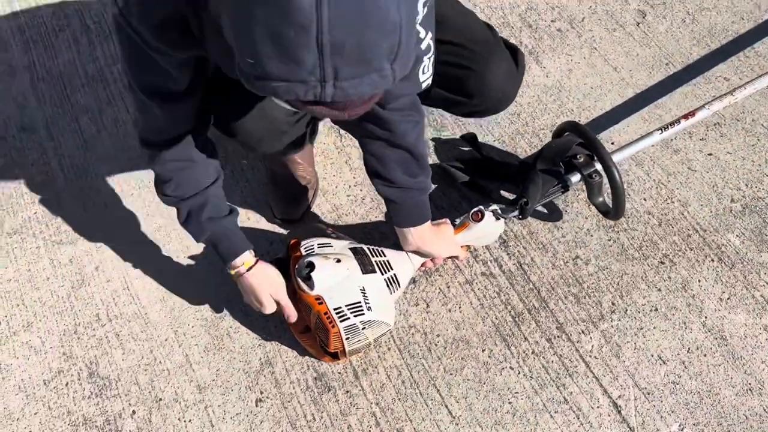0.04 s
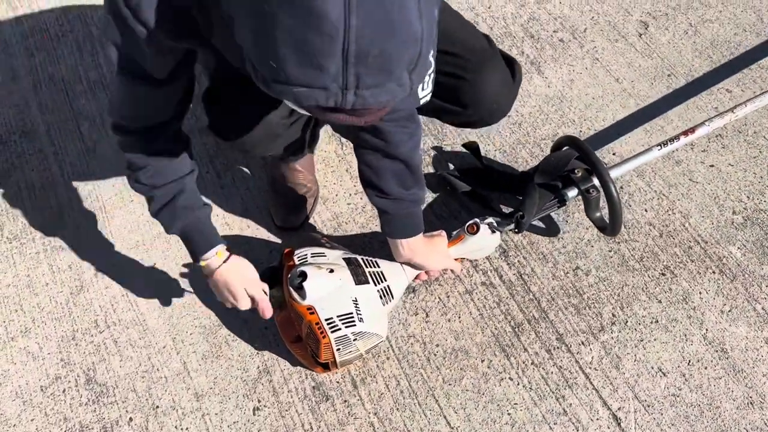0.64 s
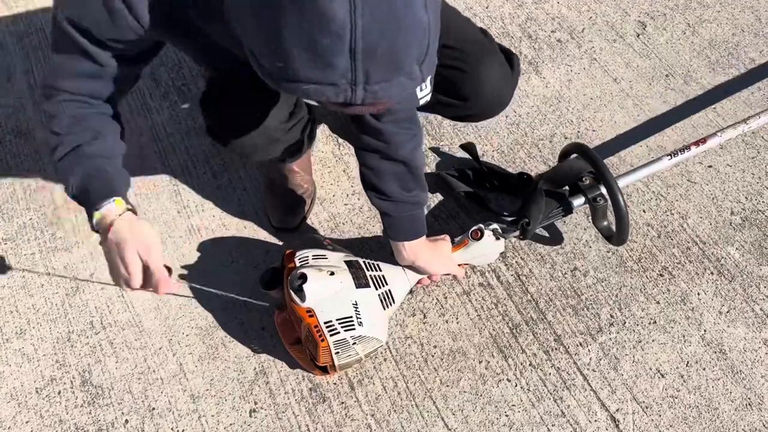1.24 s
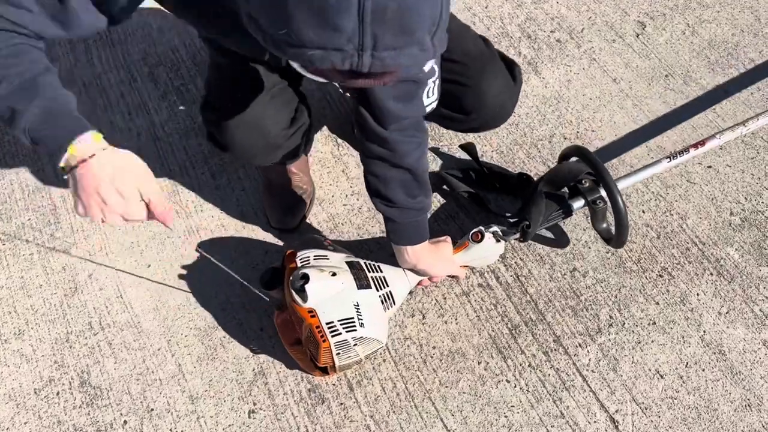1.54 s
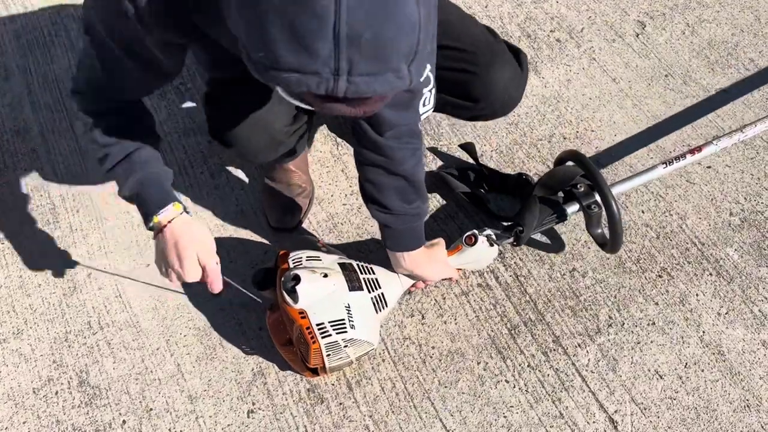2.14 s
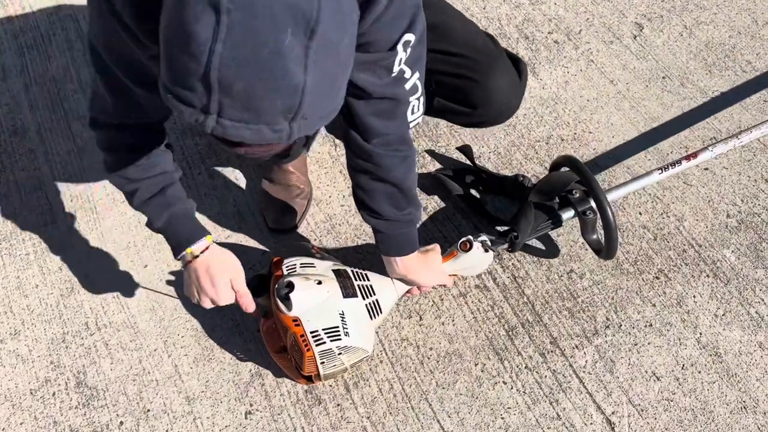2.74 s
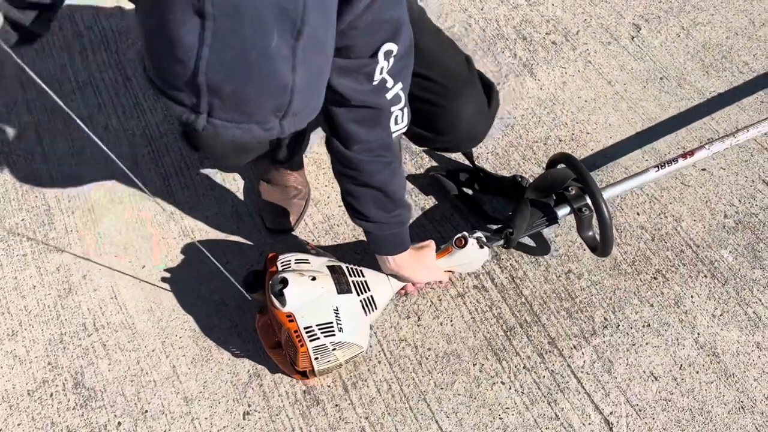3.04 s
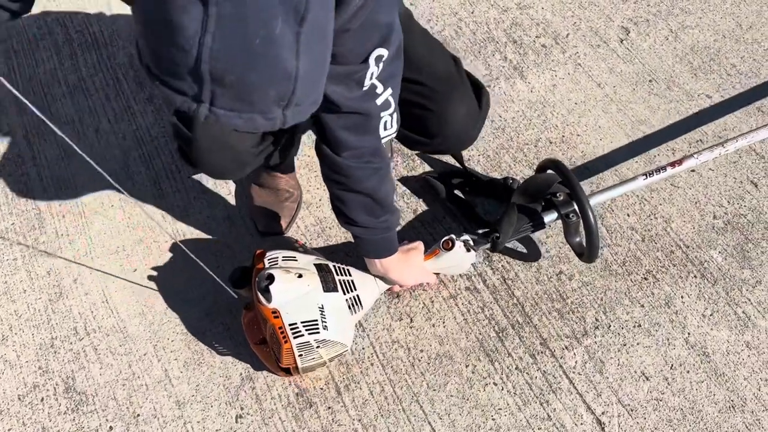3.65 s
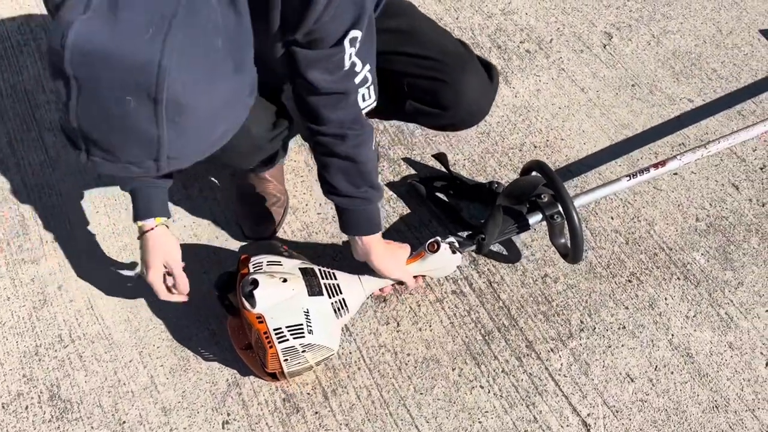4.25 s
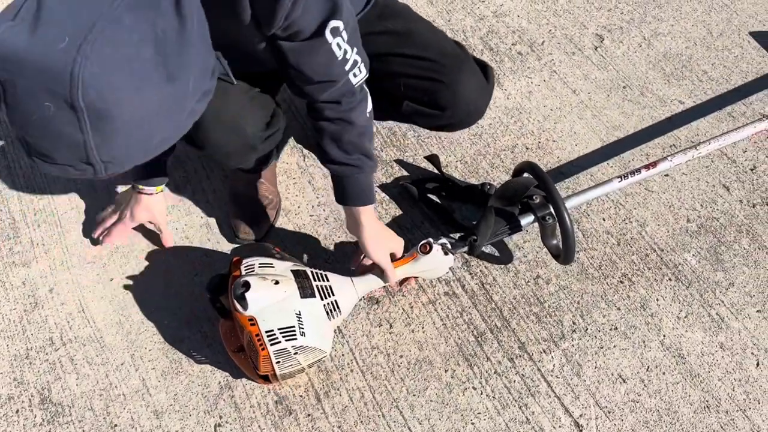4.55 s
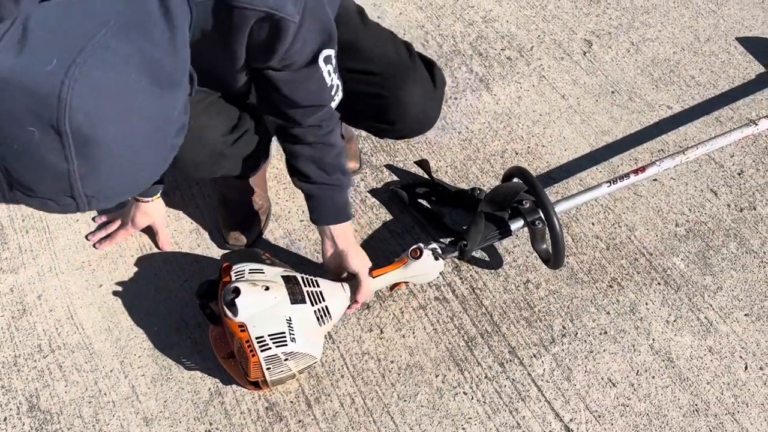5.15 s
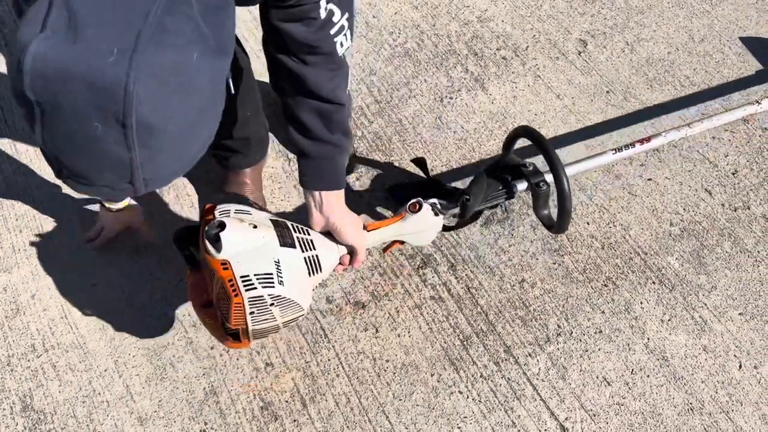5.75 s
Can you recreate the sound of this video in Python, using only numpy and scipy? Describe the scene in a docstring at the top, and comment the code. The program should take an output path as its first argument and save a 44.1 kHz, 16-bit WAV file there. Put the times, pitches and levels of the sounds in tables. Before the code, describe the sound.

Outdoors on concrete, close to the microphone, a petrol string trimmer's starter cord is pulled six times in quick succession. Each pull brings a clack, a rasp of cord and hollow chugs of the engine turning over, then a hissing rewind. The handle snaps home and a low, muffled engine drone rises and holds, with light handling bumps and faint bird chirps.

```python
"""Outdoors, on concrete: a two-stroke string trimmer has its starter cord pulled six times.
Each pull clacks the pawls, rasps the cord through its eyelet and turns the engine over in hollow
gulps of air; the plastic housing knocks and the spring reels the cord in. The handle snaps home and
a low engine drone rises and runs on, with faint bird chirps and some handling."""
import sys
import numpy as np
from scipy import signal
from scipy.fft import rfft, irfft, next_fast_len
from scipy.io import wavfile
from scipy.ndimage import uniform_filter1d

SR = 44100
rng = np.random.default_rng(int(sys.argv[2]) if len(sys.argv) > 2 else 0)


def wav_out(sig):
    """Save sig, one row per channel (or a flat mono array), as 16-bit PCM at SR to the path in sys.argv[1]."""
    wavfile.write(sys.argv[1], SR, np.round(np.clip(np.atleast_2d(sig).T, -1, 1) * 32767).astype(np.int16))


N = 260190
T = np.arange(N) / SR
HIT_T = np.arange(4096) / SR  # time axis of one impact
SIDE = np.array([[1], [-1]])  # left, right


def undb(db):
    """Decibels to gain."""
    return 10 ** (np.asarray(db) / 20)


def unit(x):
    """Scale to rms 1."""
    return x / np.sqrt(np.mean(x ** 2))


def add(track, start_s, x):
    """Mix x into the track from start_s on."""
    i = max(int(start_s * SR), 0)
    track[i:i + len(x)] += x[:max(N - i, 0)]


def butter(x, order, edge_hz, kind):
    """Butterworth filter."""
    return signal.sosfilt(signal.butter(order, edge_hz, kind, fs=SR, output="sos"), x)


def colour(x, spectrum):
    """Minimum-phase filter from (frequency [Hz], gain [dB]) rows; output rms 1."""
    size = next_fast_len(len(x) + 2048, real=True) // 2 * 2
    hz, db = np.transpose(spectrum)
    bin_hz = np.fft.rfftfreq(size, 1 / SR)
    gain = undb(np.interp(np.log(bin_hz + 1), np.log(hz), db))
    cepstrum = irfft(np.log(gain))
    cepstrum[1:size // 2] *= 2
    cepstrum[size // 2 + 1:] = 0
    response = np.exp(rfft(cepstrum))
    return unit(irfft(rfft(x, size) * response)[:len(x)])


def walk(rate_hz):
    """Smooth random wander, spread near 1."""
    return np.interp(T * rate_hz, np.arange(4096), rng.standard_normal(4096))


def grains(per_s, spread_db):
    """Dense random impulses of unequal size."""
    hits = rng.random(N) < per_s / SR
    return hits * rng.standard_normal(N) * undb(spread_db * rng.standard_normal(N))


def swell(start_s, end_s, attack_s, release_s):
    """Attack, hold, release; each ramp covers 20 dB in its time."""
    return undb(-20 * (np.maximum(start_s - T, 0) / attack_s + np.maximum(T - end_s, 0) / release_s))


def decay(t60_s, db=0):
    """Exponential decay of one impact, starting at db."""
    return undb(db - 60 * HIT_T / t60_s)


def onset(attack_s):
    """Exponential rise of one impact."""
    return 1 - np.exp(-HIT_T / attack_s)


def ping(hz, attack_s, t60_s):
    """Struck resonance with a rounded attack."""
    attack = 1 - np.exp(-(HIT_T / attack_s) ** 2)
    return attack * decay(t60_s) * np.sin(2 * np.pi * hz * HIT_T)


def scatter(x, t60_s):
    """Diffuse reverb; a separate unit-energy tail per side."""
    t = np.arange(16384) / SR
    tails = rng.standard_normal((2, len(t))) * undb(-60 * t / t60_s)
    tails /= np.linalg.norm(tails, axis=1, keepdims=True)
    return signal.fftconvolve(x[None], tails, axes=1)[:, :N]


# Outdoor background spectrum: (frequency [Hz], gain [dB])
AIR_SPECTRUM = [(25, -43.5), (55, 0), (130, -5), (600, -21), (1300, -28), (4000, -47.5), (7000, -57.5),
                (15000, -65)]


def air():
    """Low outdoor noise: centred in the bass, diffuse above."""
    mid, side = (colour(rng.standard_normal(N), AIR_SPECTRUM) * undb(.8 * walk(5)) for _ in range(2))
    return undb(-38) * mid + undb(-39) * butter(side, 1, 600, "high") * SIDE


# Bird notes: (time [s], length [s], start pitch [Hz], end pitch [Hz], relative level [dB])
CHIRPS = [(2.697, 0.071, 5460, 4980, -43.5), (5.746, 0.034, 3920, 4930, -54.5),
          (5.775, .018, 5000, 4130, -53), (5.802, 0.05, 3440, 3970, -49)]


def bird(trill_per_s=64, trill_depth_hz=170, rasp_share=.8):
    """Thin raspy chirps that slide and quiver, blurred by distance."""
    out = np.zeros(N)
    quiver_hz = trill_depth_hz * np.sin(2 * np.pi * trill_per_s * T + walk(40))
    for s, length_s, start_hz, end_hz, db in CHIRPS:
        along = np.clip((T - s) / length_s, 0, 1)
        phase = 2 * np.pi * np.cumsum(start_hz + (end_hz - start_hz) * along + quiver_hz) / SR
        rasp = walk(750) * np.sin(phase) + walk(750) * np.cos(phase)
        note = np.sqrt(1 - rasp_share) * np.sin(phase) + np.sqrt(rasp_share / 2) * rasp
        out += undb(db - 1) * np.sin(np.pi * along) * note
    return out + undb(.5) * scatter(out, t60_s=.35)


# High chirp spectrum: (frequency [Hz], gain [dB])
HIGH_CHIRP_SPECTRUM = [(3000, -31), (4200, -5), (5050, -2), (5600, -19), (7300, -23), (9000, -34)]


def high_chirp():
    """One short, raspy chirp near 5 kHz, probably a bird."""
    rasp = colour(grains(2500, 2), HIGH_CHIRP_SPECTRUM)
    return undb(-42) * rasp * swell(5.475, 5.504, attack_s=.024, release_s=.074)


# Engine run-up: (time [s], firing rate [Hz], firing tone level [dB], octave weight [dB])
RUN_UP = [(3.8, 61.9, -31, -38.5), (3.95, 65.3, -46, -28.5), (4.1, 68.2, -41, -29),
          (4.22, 73.5, -27, -30.5), (4.32, 78.2, -28.5, -21.5), (4.41, 83.7, -19, -32),
          (4.56, 87.56, -24, -39), (4.77, 87, -14, -40), (4.88, 88.1, -18.5, -42),
          (4.98, 86.65, -29.5, -36), (5.2, 86.55, -29, -36.5), (5.46, 92.9, -20.5, -40),
          (5.62, 89.24, -28, -43), (5.78, 92.3, -18, -50), (5.9, 91.8, -19.5, -32)]
# Steady engine lines: (frequency [Hz], level [dB], throb [dB])
ENGINE_LINES = [(56.3, -36.5, 1), (161, -35, 2), (199, -42, 3), (313, -48.5, 4)]
# Upper firing harmonics: (multiple, level re firing tone [dB])
PUTTER = [(4, -41.5), (5, -38.5), (6, -37), (7, -37.5), (8, -41)]
# Exhaust spectrum: (frequency [Hz], gain [dB])
EXHAUST_SPECTRUM = [(30, -28.5), (55, -15.5), (110, 5.5), (170, 12.5), (230, -2), (300, -39.5), (450, -16),
                    (900, -33), (2000, -54.5), (6000, -85)]


def drone(rate_waver=.0188, throb_db=1):
    """A muffled engine gathers speed and holds it: uneven firings, throbbing lines, exhaust rumble."""
    times, rate_hz, *levels_db = np.transpose(RUN_UP)
    curves_db = [np.interp(T, times, db, left=-np.inf, right=-np.inf) for db in levels_db]
    firing_gain, octave_gain = uniform_filter1d(undb(curves_db), size=300)
    hz = np.interp(T, times, rate_hz) * (1 + rate_waver * walk(30))
    phase = 2 * np.pi * np.cumsum(hz) / SR
    firing = firing_gain * np.sin(phase) * undb(throb_db * walk(45))
    octave = octave_gain * np.sin(2 * phase + .72 * walk(30)) * undb(-3 + 2.7 * walk(28))
    lines = sum(undb(db + depth_db * walk(26)) * np.sin(2 * np.pi * line_hz * T + .41 * walk(24))
                for line_hz, db, depth_db in ENGINE_LINES)
    lines *= np.interp(T, [4.1, 4.8], [0, 1])
    putter = firing_gain * sum(undb(db + 2.6 * walk(20)) * np.cos(k * phase) for k, db in PUTTER)
    gas = rng.standard_normal(N) * (1 + .58 * np.cos(phase))  # one puff per firing
    rumble = undb(-34) * colour(gas, EXHAUST_SPECTRUM) * np.interp(T, [3.9, 4.4], [0, 1])
    return np.sqrt(2) * (firing + octave + putter + lines) + rumble


# Sleeve and hand on the shaft: (time [s], length [s], level [dB])
BRUSHES = [(4.32, 0.016, -56.5), (4.366, 0.017, -55), (5.018, 0.66, -65.5), (5.355, 0.03, -49),
           (5.38, 0.066, -50), (5.45, 0.06, -43)]


def brushes():
    """Cloth and skin slide softly on the shaft."""
    out = np.zeros(N)
    hiss = colour(grains(14000, 1.5), [(2000, .5), (5000, 1.5), (8000, -3.5), (14000, -7)])
    for s, length_s, db in BRUSHES:
        along = np.clip((T - s) / length_s, 0, 1)
        out += undb(db) * hiss * np.sin(np.pi * along) ** 2
    return out


# Handling bumps: (time [s], relative level [dB], thud pitch [Hz], scuff cutoff [Hz])
BUMPS = [(5.682, -21.5, 450.6, 964), (5.8391, -25.5, 567.4, 2230), (5.872, -25, 342, 5460)]


def bumps():
    """The hand shifts the trimmer: soft thud, short ring, scuff."""
    out = np.zeros(N)
    ring = undb(-6.5) * ping(745, attack_s=.003, t60_s=.12)
    for s, db, hz, cutoff_hz in BUMPS:
        thud = undb(7.5) * ping(hz, attack_s=.004, t60_s=.043)
        scuff = butter(rng.standard_normal(len(HIT_T)), 2, [250, cutoff_hz], "band")
        scuff *= onset(.0025) * (decay(.016) + decay(.11, db=-19))
        add(out, s, undb(db) * (thud + ring + undb(-18) * unit(scuff)))
    return out


# Cord flicks: (time [s], level [dB])
FLICKS = [(.052, -32), (.2395, -21), (0.3236, -20), (0.9, -30), (2.1027, -31), (2.2153, -26.5),
          (2.8734, -27), (2.9457, -24), (3.283, -27.5), (3.5812, -17.5), (4.109, -23)]
# Flick spectrum: (frequency [Hz], gain [dB])
FLICK_SPECTRUM = [(1500, -21), (4000, -3.5), (7500, -0.5), (10000, -2), (13000, -3.5), (15500, -7.5)]


def flicks():
    """The cord hits its eyelet in thin bright ticks."""
    out = np.zeros(N)
    for s, db in FLICKS:
        noise = colour(rng.standard_normal(len(HIT_T)), FLICK_SPECTRUM)
        add(out, s, onset(.00085) * decay(.025, db) * noise)
    return out


# Handle strikes: (time [s], level [dB])
SNAPS = [(0.064, -16.5), (4.1136, -12), (4.127, -19.5)]
# Handle modes: (frequency [Hz], relative level [dB], t60 [s])
HANDLE_MODES = [(560, -8, 0.064), (813, -8.5, 0.056), (1104, -11, 0.059), (1682, 1, 0.037),
                (2056, -6, 0.032), (2460, 1.5, 0.014), (3100, -4, 0.016)]
# Plastic tick spectrum, handle and housing: (frequency [Hz], gain [dB])
TICK_SPECTRUM = [(2500, -9.5), (4300, 14), (6500, 4.5), (8200, 5.5), (10000, 4), (15500, -2)]


def handle_snaps():
    """The starter handle strikes its seat: crack, plastic ring, dense clatter."""
    out = np.zeros(N)
    hz, mode_db, t60_s = np.transpose(HANDLE_MODES)[:, :, None]
    for s, db in SNAPS:
        phase_cycles = rng.random((len(hz), 1))
        ring = (decay(t60_s, mode_db) * np.sin(2 * np.pi * (hz * HIT_T + phase_cycles))).sum(0)
        crack = colour(rng.standard_normal(len(HIT_T)), TICK_SPECTRUM) * decay(.018)
        clatter = unit(butter(rng.standard_normal(len(HIT_T)), 2, [1400, 3100], "band"))
        clatter *= decay(.033) + decay(.11, db=-18)
        snap = undb(-.5) * ring + undb(-11.5) * crack + undb(-4.5) * clatter
        add(out, s, undb(db) * onset(.00045) * snap)
    return out


def rattles(envelope, per_s, db, spread_db, t60_s, low_hz, high_hz):
    """Light touches at random times and pitches, scaled by the envelope."""
    out = np.zeros(N)
    wait, pitch, size = rng.random((2000, 3)).T
    times = np.cumsum(-np.log(1 - wait)) / per_s
    notes_hz = low_hz * (high_hz / low_hz) ** pitch
    levels_db = db + spread_db * np.sqrt(12) * (size - .5)
    for s, hz, touch_db in zip(times, notes_hz, levels_db):
        if s < T[-1]:
            add(out, s, envelope[int(s * SR)] * undb(touch_db) * ping(hz, .00091, t60_s))
    return out


# Cord pulls: (time [s], relative speed [dB])
PULLS = [(0.3072, -3.5), (.986, -7), (1.646, -3), (2.301, -7.5), (2.928, -4), (3.57, -4)]
# Spring rewinds: (start [s], end [s], relative speed [dB])
REWINDS = [(-.1, 0.0011, -8), (.055, 0.058, -13), (0.525, 0.63, -2.5), (1.197, 1.326, -7),
           (1.885, 1.98, -4), (2.526, 2.6, -2.5), (3.154, 3.236, -2.5), (3.793, 3.887, -3.5),
           (4.109, 4.09, -10)]
# Cord hiss spectrum: (frequency [Hz], gain [dB])
HISS_SPECTRUM = [(1800, -41), (4300, 18.5), (6500, 11.5), (8200, 18.5), (10000, 3.5), (13500, 15),
                 (15500, -7)]
# Pulley scrape spectrum: (frequency [Hz], gain [dB])
SCRAPE_SPECTRUM = [(60, 3.5), (150, -7), (350, -2.5), (550, 9.5), (680, 0), (820, 7), (1100, -6),
                   (1400, -4.5), (2200, -6.5), (3100, -3), (4300, -8.5), (7000, -30.5)]


def cord():
    """The cord slips through its eyelet; the pulley scrapes, loose parts tinkle, uneven coils bump."""
    speed = np.zeros(N)
    for s, db in PULLS:
        slack = undb(-19) * swell(s - .13, s, attack_s=.088, release_s=.15)
        draw = undb(db) * swell(s + .025, s + .11, attack_s=.018, release_s=.15)
        speed = np.max([speed, slack, draw], axis=0)
    for start_s, end_s, db in REWINDS:
        speed = np.maximum(speed, undb(db) * swell(start_s, end_s, attack_s=.012, release_s=.06))
    flutter = undb(2.2 * walk(200))
    hiss = colour(grains(12000, 2) * flutter, HISS_SPECTRUM) * undb(-32) * speed
    scrape = colour(grains(5000, 3) * flutter, SCRAPE_SPECTRUM) * undb(-26) * speed ** .76
    tinkle = rattles(speed ** .61, per_s=280, db=-25.5, spread_db=3.5, t60_s=.016,
                     low_hz=1845, high_hz=3427)
    coils = rattles(speed ** .55, per_s=55, db=-24.5, spread_db=1.5, t60_s=.056,
                    low_hz=475, high_hz=949)
    return hiss + scrape + tinkle + coils


# Pawl catches: (time [s], gap [s], clack 1 [dB], thud 1 [dB], clack 2 [dB], thud 2 [dB])
PAWLS = [(0.237, 0.023, -14.5, -12.5, -18, -16), (0.8763, 0.025, -19.5, -16, -21.5, -19.5),
         (1.559, 0.027, -21, -15.5, -22.5, -25), (2.2158, 0.029, -20, -15.5, -24, -11.5),
         (2.8424, .032, -28, -20, -28, -10), (3.471, 0.027, -26.5, -17.5, -26.5, -24)]


def pawl_rings(first_hz=2077, second_hz=3230):
    """Two pawls catch in turn, each ringing on its own note."""
    out = np.zeros(N)
    for s, gap_s, *_ in PAWLS:
        for lag_s, hz in (0, first_hz), (gap_s, second_hz):
            add(out, s + lag_s, undb(-27) * ping(hz, attack_s=.0011, t60_s=.055))
    return out


# Housing knocks, ending with three light pawl ticks: (time [s], clack [dB], thud [dB])
KNOCKS = [(0.323, -26.5, -13.5), (.338, -17, -3), (.376, -17, -15), (0.9445, -24.5, -23),
          (.988, -16.5, -9.5), (0.9962, -24.5, -9), (1.0404, -13, -2), (1.082, -9, -7), (1.096, -14.5, -14),
          (1.1145, -18.5, -12), (1.1754, -22.5, -14), (1.389, -40, -19.5), (1.651, -22, -7.5),
          (1.7044, -21.5, -15), (1.815, -18, -21), (2.33, -18.5, -14), (2.4065, -27.5, -12),
          (2.947, -20, -4), (2.961, -16, -11), (2.986, -20, -9), (3.0239, -20, -13), (3.5118, -26, -17.5),
          (3.5815, -19, -3), (3.6142, -16, -3), (3.6313, -12.5, -7), (3.733, -18.5, -18), (4.024, -34, -40),
          (4.053, -33, -35), (4.0817, -33, -34)]


def blows(knock_hz=627, drop_hz=566, stop_hz=674, slap_hz=893, slap_db_per_s=132):
    """All impacts on the housing: (time [s], clack [dB], thud [dB], thud pitch [Hz])."""
    rows = [(*knock, knock_hz) for knock in KNOCKS]
    for s, gap_s, *levels_db in PAWLS:
        rows += [(s, *levels_db[:2], knock_hz), (s + gap_s, *levels_db[2:], knock_hz)]
    rows += [(s + .455, -35.5, -29.5, drop_hz) for s, _ in PULLS]  # pawls drop back
    rows += [(end_s + .027, db - 28.5, db - 21.5, stop_hz) for _, end_s, db in REWINDS]  # reel jerks
    for s, turn_s, db in turns():  # compression slaps the starter, harder on long turns
        rows.append((s - .013, db - 22 + slap_db_per_s * turn_s, db - 10.5, slap_hz))
    return rows


# Plastic housing modes: (frequency [Hz], relative level [dB], t60 [s])
HOUSING_MODES = [(581, 14, 0.026), (802, 8.5, 0.029), (1105, 2.5, 0.039), (1696, -3.5, 0.047),
                 (2200, 3.5, 0.023), (2404, 7.5, 0.0096), (2766, 7, 0.0086), (3170, 5.5, 0.0074)]


def housing_knocks(split_hz=1200, pitch_spread=.14):
    """Chattering plastic rings the high modes and ticks; the housing thuds over its low modes."""
    out, size = np.zeros(N), len(HIT_T)
    hz, mode_db, t60_s = np.transpose(HOUSING_MODES)[:, :, None]
    low = hz[:, 0] < split_hz
    chatter = onset(.0037) * (decay(.021) + decay(.13, db=-22.5))
    for s, clack_db, thud_db, thud_hz in blows():
        noise = rng.standard_normal((3, size))
        level_jitter, pitch_jitter = rng.standard_normal((2, len(hz), 1))
        modes = np.sin(2 * np.pi * hz * (1 + .035 * pitch_jitter) * HIT_T)
        modes *= decay(t60_s, mode_db + 3.5 * level_jitter)
        ring = signal.fftconvolve(noise[0] * chatter, modes[~low].sum(0))[:size]
        rattle = signal.fftconvolve(noise[1] * decay(.033), modes[low].sum(0))[:size]
        tick = colour(noise[2] * chatter, TICK_SPECTRUM)
        tone = ping(thud_hz * (1 + pitch_spread * rng.standard_normal()), attack_s=.0023, t60_s=.023)
        clack = undb(-14.5) * unit(ring) + undb(-22.5) * tick
        thud = undb(5) * tone + undb(-19) * unit(rattle)
        add(out, s, undb(clack_db) * clack + undb(thud_db) * thud)
    return out


def gulp(t, top_hz, low_hz, glide_s, width_s, ring_db, t60_s):
    """A port opens at t = 0: the cylinder note drops to the muffler note, which rings on."""
    hz = low_hz + (top_hz - low_hz) * (1 - np.tanh(t / glide_s + .95)) / 2
    phase = 2 * np.pi * np.cumsum(hz) / SR
    burst = 1 / (1 + ((t + .0002) / width_s) ** 2) ** 2
    ring = undb(ring_db - 60 * np.abs(t) / t60_s) * (1 + np.tanh(t / width_s)) / 2
    return (burst + ring) * np.cos(phase - np.interp(0, t, phase))


# Piston gulps, one per turn, slowed by compression through each pull: (time [s], level [dB])
GULPS = [(0.307, -7.5), (0.3419, -9), (0.379, -9.5), (0.4228, -9), (0.4834, -11.5), (0.5614, -22),
         (0.9864, -7.5), (1.029, -10), (1.0802, -7.5), (1.1453, -15.5), (1.646, -7.5), (1.6839, -8),
         (1.72, -7.5), (1.771, -11), (1.8326, -12), (1.913, -24.5), (2.3012, -8), (2.3368, -9),
         (2.3726, -10), (2.4186, -9.5), (2.4785, -13.5), (2.55, -18), (2.9281, -7.5), (2.9634, -10),
         (2.9958, -8), (3.0358, -9), (3.1064, -12.5), (3.1798, -19.5), (3.569, -8.5), (3.6041, -8.5),
         (3.6403, -8.5), (3.6856, -10.5), (3.7461, -14.5), (3.8204, -20.5)]
LONGEST_TURN_S = .08


def turns():
    """Crank turns, gulp to gulp, capped in length: (time [s], length [s], level [dB])."""
    times, db = np.transpose(GULPS)
    lengths_s = np.minimum(np.diff(times, append=np.inf), LONGEST_TURN_S)
    return list(zip(times, lengths_s, db))


# Rattle spectrum of the engine works: (frequency [Hz], gain [dB])
WORKS_SPECTRUM = [(60, -44), (140, 3.5), (400, 4.5), (1200, -10), (2500, -9), (6000, -30)]


def cranking(lead_s=.03, second_port_turns=.39):
    """Each turn: a port whistle, the main gulp, a softer gulp at the second port, rattling works."""
    out, works_gain = np.zeros(N), np.zeros(N)
    t = np.arange(int(.16 * SR)) / SR - lead_s
    creeps = [(s - .025, LONGEST_TURN_S, -20) for s, *_ in PAWLS]  # one slow turn before each catch
    for s, turn_s, db in creeps + turns():
        pitch_jitter, whistle_jitter, level_jitter = rng.standard_normal(3)
        tune = 1 + .07 * pitch_jitter
        main = gulp(t, 1000 * tune, 125 * tune, glide_s=.00357, width_s=.0038, ring_db=-13, t60_s=.13)
        second = gulp(t - second_port_turns * turn_s, 800 * tune, 210 * tune,
                      glide_s=.0043, width_s=.0047, ring_db=-11, t60_s=.15)
        second *= undb(-9.5 + 2.5 * level_jitter)
        whistle_hz = 900 * (1 + .053 * whistle_jitter)
        whistle = undb(-2) * np.exp(-((t + .01) / .0025) ** 2) * np.sin(2 * np.pi * whistle_hz * t)
        speed = undb(.5 * (db - 3.5))  # whistle and works fade faster than the gulp
        add(out, s - lead_s, undb(db) * (main + speed * whistle + second))
        add(works_gain, s - lead_s, undb(db) * speed * np.exp(-((t - .012) / .018) ** 2))
    return out + undb(-6.5) * works_gain * colour(grains(1400, 2.5), WORKS_SPECTRUM)


# Phase between the two microphone ports: (frequency [Hz], left lead [rad])
MIC_PHASE = [(600, 0), (1210, .5), (1680, 5.9), (4200, 8.1), (4600, 10.6), (7000, 12.7), (10700, 9),
             (11800, 6.4), (15000, 5)]


def yard(x, left_over_right_db=-.1):
    """Near sound reaches the microphone ports out of step; concrete and walls add a short tail."""
    lead_rad = np.interp(np.fft.rfftfreq(2 * N, 1 / SR), *np.transpose(MIC_PHASE))
    direct = irfft(rfft(x, 2 * N) * np.exp(.5j * lead_rad * SIDE))[:, :N]
    tail = scatter(butter(x, 2, [600, 7000], "band"), t60_s=.087)
    return direct * undb(SIDE * left_over_right_db / 2) + undb(-9) * tail


def shifting_echoes(x, side_db):
    """Echoes from all around: level and phase wander between the ears."""
    echoes = np.real(signal.hilbert(x) * (walk(25) + 1j * walk(25)))
    return x + undb(side_db) * echoes * SIDE


def scene():
    """Trimmer and one high chirp close by; drone, bird and air beyond."""
    # the cord sounds along its whole length, so part of its treble is wide
    wide_cord = undb(-4) * butter([cord(), cord()], 2, [900, 11000], "band")
    trimmer = cranking() + housing_knocks() + pawl_rings() + flicks()
    trimmer += bumps() + handle_snaps() + cord() + brushes()
    near = yard(trimmer + high_chirp()) + wide_cord
    return near + shifting_echoes(drone(), side_db=-15.5) + bird() + air()


def record(dry):
    """Microphone: low cut, soft rounding of the highest peaks, steep top cut."""
    low_hz, top_hz, ceiling = 38, 15300, .92
    dry = butter(dry, 3, low_hz, "high")
    rounded = dry / (1 + (dry / ceiling) ** 4) ** (1 / 4)
    return signal.sosfilt(signal.ellip(8, .2, 80, top_hz, fs=SR, output="sos"), rounded)


dry = scene()
out = record(dry)
wav_out(out)
```